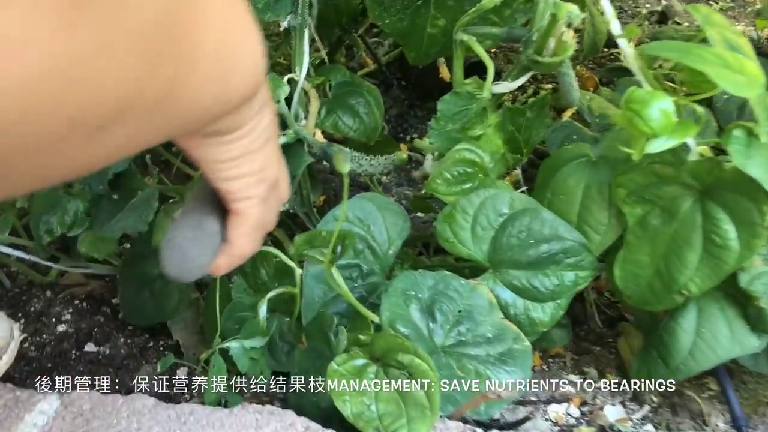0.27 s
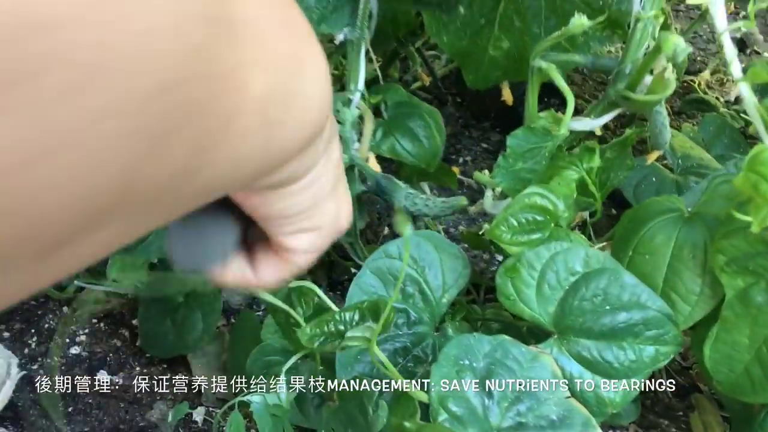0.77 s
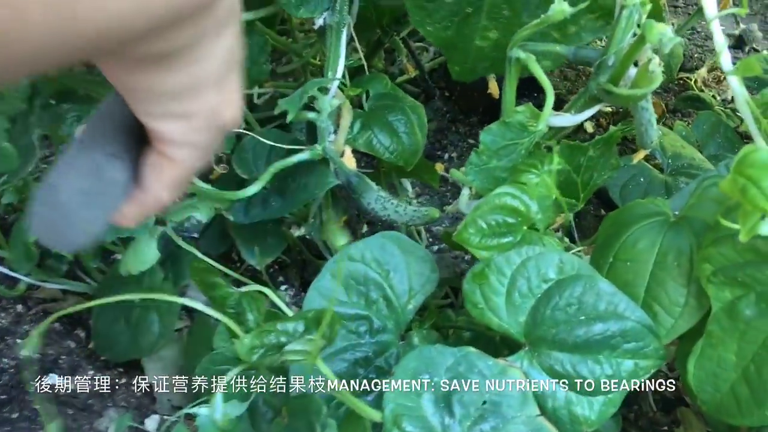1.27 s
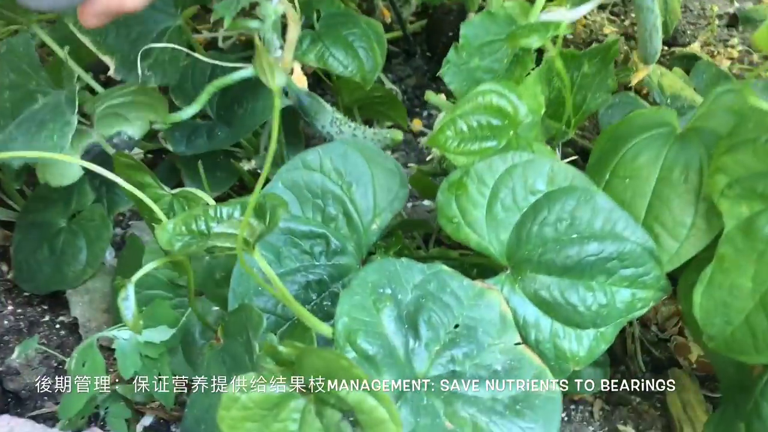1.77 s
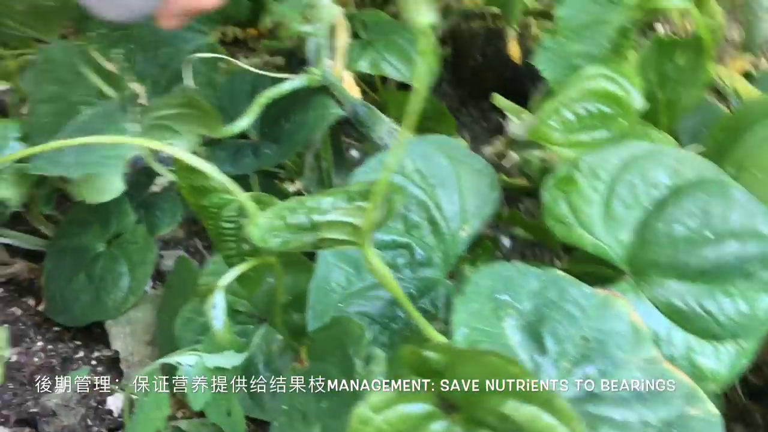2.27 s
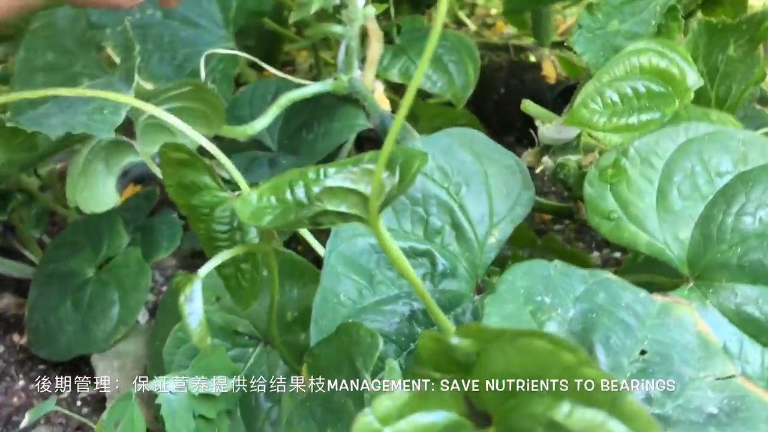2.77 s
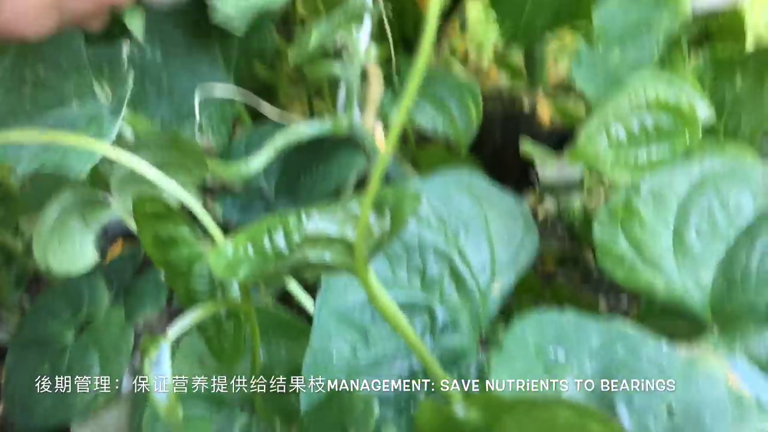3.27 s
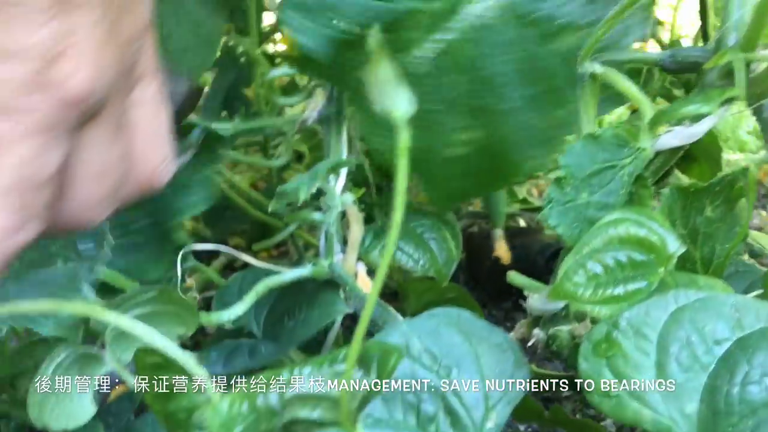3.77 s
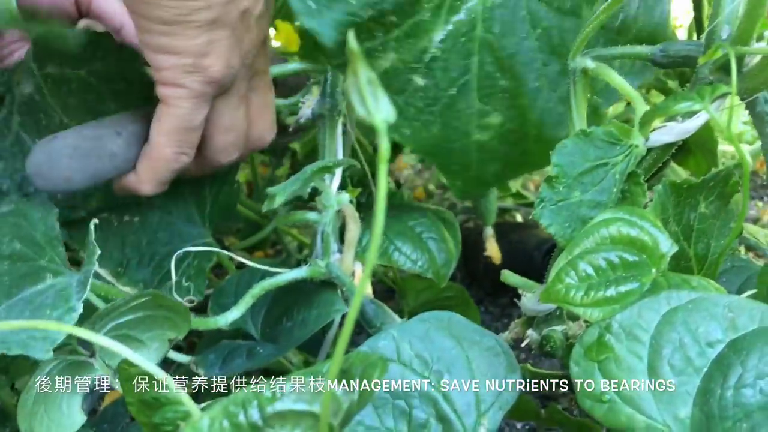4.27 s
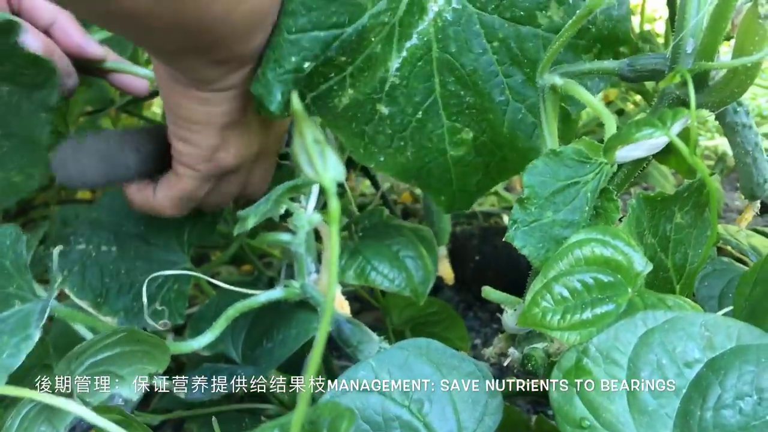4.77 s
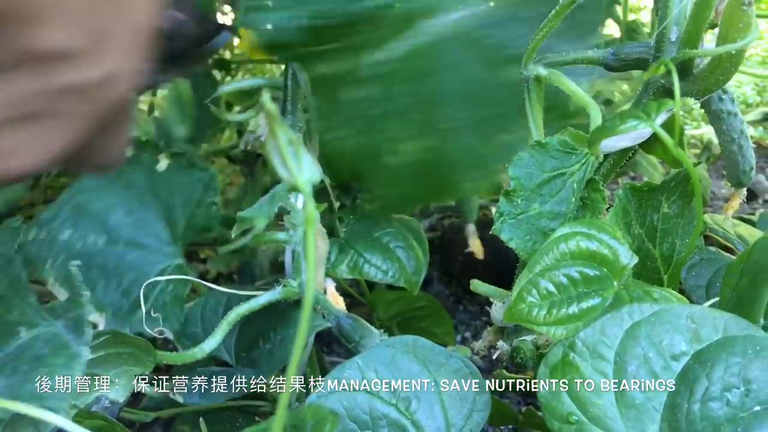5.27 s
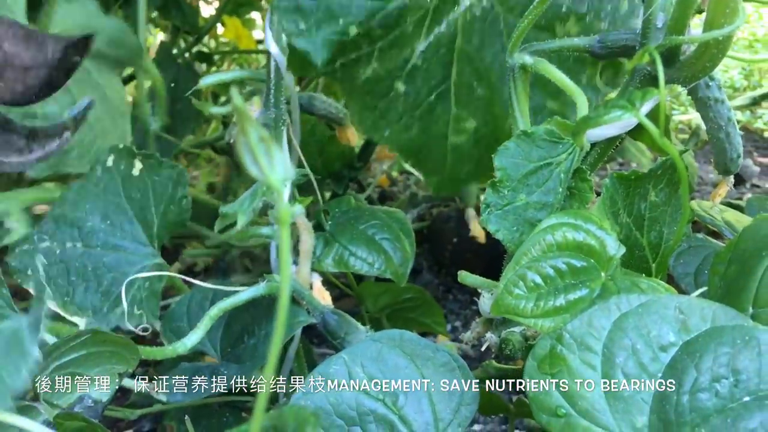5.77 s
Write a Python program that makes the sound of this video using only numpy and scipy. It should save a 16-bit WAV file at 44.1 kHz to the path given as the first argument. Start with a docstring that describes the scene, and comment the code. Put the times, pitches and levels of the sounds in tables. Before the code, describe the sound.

In an open garden, heard close up, soft leaf rustle leads to a quick, squeaky shear snip. More leaf sweeps follow, then a louder, crunchier second snip, a busy passage of rasping, flicking foliage, and a third, more drawn-out stuttering squeal with a light crunch. Small lower squeaks and thin chirps follow each cut as the shears reopen. A low steady far-off machine hum lies beneath, with almost no echo.

```python
"""Leaves brush the arm from the start: noise of tiny impacts swelling in sweeps, with rasping drags and ticks.
Three cuts with hand pruning shears follow in a garden bed, near 0.6, 2.4 and 4.8 s. In each the dry steel
blades squeal shut (gliding stick-slip tones), crunch through a stem (grain bursts ringing steel and handles),
then squeak lower as the spring opens them; the pivot chirps thinly. Throughout, a distant machine hums
(sines over low noise) in faint air; a thin hiss rises towards the end."""
import sys
import numpy as np
from scipy import signal
from scipy.fft import rfft, irfft, next_fast_len
from scipy.io import wavfile

SR = 44100
rng = np.random.default_rng(int(sys.argv[2]) if len(sys.argv) > 2 else 0)


def put_to_file(sound):
    """Save the sound as 16-bit audio at rate SR, in the file named by the first command-line argument."""
    columns = np.atleast_2d(sound).T  # one column per channel
    safe = np.clip(columns, -1, 1)
    whole_steps = np.round(safe * 32767)
    wavfile.write(sys.argv[1], SR, whole_steps.astype(np.int16))


N = 265834
TIME_S = np.arange(N) / SR

# slips of the closing, then opening blades:
# (start [s], length [s], first pitch [Hz], last pitch [Hz], fundamental level [dB], roughness [0-1])
CLOSING_SLIPS = [(.608, 0.018, 6500, 6560, -25.5, .1), (.624, .015, 6590, 6630, -23, .35),
                 (.6395, 0.0066, 6440, 6360, -15, 0.53), (.649, .011, 6700, 6920, -26.5, 0.7),
                 (.665, .008, 7150, 7250, -31, 0.7), (.675, 0.0062, 4480, 4630, -26.5, 0.88),
                 (2.418, .004, 5900, 5660, -18, 0.5), (2.422, 0.0044, 5380, 5340, -14, 0.63),
                 (2.431, 0.01, 6140, 6300, -16.5, 0.6), (2.4465, .009, 6450, 6880, -14.5, 0.65),
                 (2.456, 0.0091, 6850, 7320, -22.5, .85), (2.466, 0.028, 4550, 4800, -41, .75),
                 (2.486, 0.0083, 4200, 4900, -25.5, 0.88), (4.794, 0.0054, 6030, 5970, -34, .1),
                 (4.801, 0.01, 6050, 6100, -20, 0.07), (4.812, 0.011, 6240, 6120, -22, 0.07),
                 (4.823, .014, 6060, 6170, -21, 0.08), (4.836, 0.012, 6200, 6100, -25, 0.4),
                 (4.85, 0.039, 6150, 6370, -44, .3), (4.914, 0.012, 6700, 6750, -26.5, 0.27),
                 (4.927, 0.027, 6560, 6370, -42, 0.7), (4.959, 0.008, 6800, 6830, -22.5, 0.57),
                 (4.972, 0.013, 6600, 7120, -20.5, 0.63), (5.0, 0.0028, 5950, 5800, -24, 0.7)]
OPENING_SLIPS = [(.843, .006, 3760, 3680, -31, 0.33), (.884, 0.02, 3950, 3730, -38, 0.3),
                 (.906, 0.024, 3780, 3760, -45.5, 0.1), (2.769, 0.0095, 3810, 3650, -27, 0.28),
                 (2.814, 0.021, 3910, 3620, -29, 0.24), (2.836, 0.033, 3560, 3400, -42, 0.05),
                 (5.262, 0.011, 3930, 3660, -39.5, 0.57), (5.298, 0.029, 3750, 3760, -45.5, .1)]
# chirps of the pivot: (centre [s], pitch [Hz], level [dB], length [s])
PIVOT_CHIRPS = [(.895, 13100, -43, 0.015), (1.245, 13400, -58, .02), (2.496, 6380, -26, 0.0045),
                (2.819, 14100, -35, .014), (2.871, 13700, -42, 0.014), (2.915, 13300, -43, .02),
                (5.211, 3460, -48, 0.009), (5.266, 12600, -40, .016), (5.669, 13300, -34, 0.012)]
# blade crushing through a stem: (centre [s], level [dB], length [s])
STEM_CRUNCHES = [(0.664, -47.5, .025), (0.676, -33, 0.014), (0.689, -38.5, 0.027), (2.444, -32, 0.015),
                 (2.462, -34.5, 0.03), (2.494, -33, 0.032), (4.959, -39, 0.0083), (4.99, -36.5, 0.039),
                 (5.003, -36.5, 0.0078)]
# modes of the steel blades: ([Hz])
BLADE_MODES_HZ = [4330, 9000, 12460]
# arm sweeping through leaves:
# (start [s], length [s], relative level [dB], growth over the sweep [dB], treble over middle [dB])
LEAF_SWEEPS = [(0, 0.11, -52, -10, -2), (.47, .06, -62, 0, 12), (0.707, 0.063, -52, 3, 5),
               (0.828, 0.11, -49.5, 13, -1.5), (1.139, 0.078, -49, -6, 1), (1.21, 0.15, -50.5, 10, -2),
               (1.384, 0.465, -44.5, 4.5, -1), (1.992, 0.18, -55.5, 2, -9), (2.502, 0.052, -49, 7, -11),
               (2.787, 0.17, -47.5, -1, -2.5), (2.973, 0.23, -43, 0, -4.5),
               (3.231, 0.16, -43.5, -4.5, -3.5), (3.413, 0.11, -43.5, 5, 1.5), (3.481, 0.29, -35, -2, 0.5),
               (3.731, 0.2, -40, -1, -4.5), (4.13, 0.092, -48.5, 1, 1), (4.238, 0.055, -39.5, 2, 4),
               (4.285, 0.13, -55, -5, -3), (4.53, 0.07, -48.5, -3, -6.5), (5.233, 0.24, -46.5, -3, -4.5),
               (5.584, 0.16, -50, 8, -1.5), (5.779, 0.087, -41, -3, -9)]
# faint rustle between sweeps: (time [s], relative level [dB])
RUSTLE_LEVEL = [(0, -63), (.4, -56.5), (.6, -88), (.8, -55), (1.05, -63.5), (1.25, -62), (1.93, -77),
                (2.2, -62.5), (2.4, -57), (2.65, -53.5), (4.0, -58.5), (4.1, -52.5), (4.7, -55.5),
                (5.05, -50.5), (5.52, -57.5), (6.03, -49.5)]
# leaves and stalks flicking: (peak time [s], relative level [dB], treble over middle [dB])
LEAF_FLICKS = [(.278, -45, 6), (0.816, -39, -1), (1.072, -44.5, 10), (1.161, -41, 6), (1.889, -41, 1),
               (2.004, -42, -1), (2.076, -39, -13), (2.661, -34, -9), (2.798, -39.5, 18), (2.97, -31, -2.5),
               (3.422, -39, 2), (3.694, -25.5, -5), (4.023, -44.5, -3), (5.125, -43, -13),
               (5.139, -43.5, -24), (5.572, -43, 0), (5.763, -36, 4)]
# leaf or stalk dragging over the arm: (centre [s], level [dB], length [s], resonance [Hz])
LEAF_DRAGS = [(1.086, -55, 0.027, 2700), (1.171, -48, 0.045, 3020), (1.616, -58, 0.61, 3470),
              (1.832, -51, 0.088, 750), (1.85, -47.5, 0.031, 1480), (2.663, -46.5, 0.04, 1980),
              (3.058, -51, 0.23, 1490), (3.424, -46.5, 0.05, 5400), (3.57, -41.5, 0.21, 3800),
              (3.681, -34, 0.082, 4030), (3.72, -45.5, 0.19, 1390), (3.852, -44, 0.061, 2830),
              (4.258, -41.5, .052, 6240), (5.81, -56, .15, 920)]
# thin hiss: (time [s], level [dB])
WHINE_LEVEL = [(.4, -77), (.6, -82), (4, -81), (5.6, -62.5)]
# far machine: (time [s], level [dB])
MACHINE_LEVEL = [(0, -50), (.65, -49), (.85, -45.5), (2.0, -44), (3.6, -49), (4.3, -45.5), (6.03, -46.5)]
# steady tones of the machine: (frequency [Hz], level relative to the machine [dB])
MACHINE_TONES = [(37.5, -22.5), (53, -9.5), (113, -10), (120, -7), (205.5, -14), (240, -20)]
# spectral shapes of leaf, stem, machine rumble and outdoor air: (frequency [Hz], gain [dB])
LEAF_SPECTRUM = [(250, 1.5), (500, -5), (900, -4), (1500, -2.5), (2200, -1), (2750, -4.5), (3700, 0),
                 (5000, -2), (6300, 1), (7800, -4), (9400, -1), (10400, -9), (11300, -5), (15800, -11.5)]
STEM_SPECTRUM = [(400, -3.5), (1000, -10.5), (1900, -2.5), (2800, -2), (4600, -2), (7500, 4), (9200, -5),
                 (10500, -7), (15800, 4)]
RUMBLE_SPECTRUM = [(30, -23), (38, 3), (52, -11), (68, -2.5), (92, 1.5), (125, 1.5), (150, -2), (175, -6.5),
                   (200, -6), (235, -12.5), (280, -15.5), (350, -21), (480, -48)]
AIR_SPECTRUM = [(350, 7.5), (700, 6.5), (1000, 1), (1300, -2.5), (1800, -0.5), (2200, -11), (2800, -2.5),
                (3700, -8), (4900, -6), (6400, -2.5), (9000, -8.5), (15000, -2)]


def squeaks(slips, jitter, waver, flutter_db, third_db, fourth_db):
    """Stick-slip drives a blade mode: a gliding, wavering tone breaks up and gains its octave as grip hardens."""
    clean_octave_db, rough_octave_db = -24, 10   # at roughness 0 and 1
    attack_s, release_s, sag_db = 0.0011, 0.0013, 0.8
    out, fast, slow = np.zeros(N), drift(580), drift(83)
    flutter = [np.tanh(drift(200)) - 1 for _ in range(4)]   # each partial dips on its own
    for start_s, length_s, first_hz, last_hz, level_db, rough in slips:
        rough = np.clip(rough, 0, 1)
        on, progress, envelope = gate(start_s, length_s, attack_s, release_s)
        glide_hz = first_hz + (last_hz - first_hz) * progress
        pitch_hz = glide_hz * (1 + jitter * rough * fast[on] + waver * slow[on])
        phase = 2 * np.pi * np.cumsum(pitch_hz) / SR
        octave_db = clean_octave_db + (rough_octave_db - clean_octave_db) * rough
        tone = 0
        for k, partial_db in enumerate([0, octave_db, third_db, fourth_db], 1):
            gain = from_db(partial_db + flutter_db * rough * flutter[k - 1][on])
            below_nyquist = k * pitch_hz < SR / 2
            tone = tone + gain * np.sin(k * phase) * below_nyquist
        out[on] += np.sqrt(2) * tone * envelope * from_db(level_db - sag_db * progress)
    return out


def pivot(wobble_hz=230):
    """The pivot catches for an instant and sings one wavering note."""
    wobble = wobble_hz * np.cumsum(drift(532)) / SR   # in cycles
    out = np.zeros(N)
    for centre_s, hz, level_db, length_s in PIVOT_CHIRPS:
        note = np.sin(2 * np.pi * (hz * TIME_S + wobble))
        out += np.sqrt(2) * from_db(level_db) * swell(centre_s, length_s) * note
    return out


def stems(blade_db=-12, blade_q=45, body_db=-1, body_hz=1850, body_q=8):
    """Fibres burst in a dense run as the edge passes through, and set the steel and the handles ringing."""
    fibres = coloured(grains(per_s=7800, spread_db=5.5), STEM_SPECTRUM)
    force = sum(from_db(db) * swell(centre_s, length_s) for centre_s, db, length_s in STEM_CRUNCHES)
    snap = fibres * force
    steel = sum(resonance(snap, hz, blade_q) for hz in BLADE_MODES_HZ) * np.sqrt(blade_q)
    handles = resonance(snap, body_hz, body_q)
    return snap + from_db(blade_db) * steel + from_db(body_db) * handles


def scatter(x, level_db=-21, t60_s=0.087):
    """Soil and surrounding leaves send back a faint, short spray of echoes."""
    age_s = TIME_S[:SR // 5]
    echoes = rng.standard_normal(len(age_s)) * from_db(-60 * age_s / t60_s) * (age_s > 0.003)
    return from_db(level_db) * signal.fftconvolve(x, echoes / np.linalg.norm(echoes))[:N]


def foliage(patchy_db=1.4, crackle_db=-2, sweep_db=-2.0, rustle_db=-3, rustle_bright_db=-3,
            wander_db=-1.5, colour_db=2.5):
    """Leaf hairs catch and let go: fine hiss with coarser crackle, faint between sweeps, louder in each."""
    attack_s, release_s = 0.01, 0.013   # leaves bend against the arm, then slide off it
    coarse = crackle(per_s=2600, spread_db=2.5, q=6.7, patchy_db=2)
    hairs = grains(per_s=11000, spread_db=1.0) + from_db(crackle_db) * coarse
    power = from_db(in_time(RUSTLE_LEVEL)[0] + rustle_db + wander_db * drift(24)) ** 2
    weighted_bright = power * rustle_bright_db
    for start_s, length_s, level_db, growth_db, bright_db in LEAF_SWEEPS:
        on, progress, envelope = gate(start_s, length_s, attack_s, release_s)
        sweep_level_db = sweep_db + level_db + growth_db * (progress - 0.5)
        sweep_power = (envelope * from_db(sweep_level_db)) ** 2
        power[on] += sweep_power
        weighted_bright[on] += sweep_power * bright_db
    tilt_db = weighted_bright / power + colour_db * drift(6.6)
    texture = tilted(coloured(hairs, LEAF_SPECTRUM), tilt_db)
    return texture * np.sqrt(power) * from_db(patchy_db * drift(35))


def crackle(per_s, spread_db, q, patchy_db, count=14):
    """Small snaps come in clumps, each ringing for a few cycles at the pitch of its own patch of leaf."""
    pitches_hz = np.geomspace(900, 12000, count)
    out = np.zeros(N)
    for hz in pitches_hz:
        snaps = grains(per_s * hz / pitches_hz.sum(), spread_db)   # higher patches snap more often
        out += resonance(snaps, hz, q) * from_db(patchy_db * drift(22.0))
    return rms_one(out)


def drags(q=2.07):
    """A leaf slips in small jerks that keep its blade ringing."""
    jerks, out = grains(per_s=4000, spread_db=3.5), np.zeros(N)
    for centre_s, level_db, length_s, hz in LEAF_DRAGS:
        stroke = swell(centre_s, length_s)
        on = stroke > 0
        rasp = resonance(resonance(jerks[on], hz, q), hz, q)
        out[on] += from_db(level_db) * stroke[on] * rms_one(rasp)
    return out


def flicks(level_db=-2, rise_s=0.00098, decay_s=0.0041):
    """A snagged leaf springs free with a short burst that dies at once."""
    force, bright_db = np.zeros(N), np.zeros(N)
    for peak_s, flick_db, flick_bright_db in LEAF_FLICKS:
        start = int((peak_s - rise_s) * SR)
        age_s = TIME_S[:min(SR // 10, N - start)]
        shape = np.minimum(age_s / rise_s, 1) * np.exp(-age_s / decay_s)
        force[start:start + len(age_s)] += from_db(flick_db) * shape
        bright_db[start:] = flick_bright_db   # held until the next flick
    texture = coloured(grains(per_s=9200, spread_db=1.8), LEAF_SPECTRUM)
    return from_db(level_db) * force * tilted(texture, bright_db)


def stirring(level_db=-62, per_s=40, spread_db=0.9, decay_s=0.0035):
    """Disturbed leaves keep settling: scattered impacts open decaying bursts of leaf-coloured noise."""
    decay = np.exp(-1 / (decay_s * SR))
    ticks = signal.lfilter([1], [1, -decay], np.abs(grains(per_s, spread_db)) + 1e-18)
    return from_db(level_db) * rms_one(ticks * coloured(rng.standard_normal(N), LEAF_SPECTRUM))


def whine(hz=2180, q=6.8, waver_db=2.0):
    """Doubly resonant noise: a thin, wavering band of distant hiss sinks away and returns."""
    band = rms_one(resonance(resonance(rng.standard_normal(N), hz, q), hz, q))
    return band * from_db(in_time(WHINE_LEVEL)[0] + waver_db * drift(3.0))


def background(rumble_db=-0.5, air_db=-60, waver_db=1.75, waver_rad=0.92, lumpy_db=1.06):
    """A far machine: tones wavering in level and phase in a low rumble, under faint outdoor air."""
    tones = np.zeros(N)
    for hz, tone_db in MACHINE_TONES:
        gain = from_db(tone_db + waver_db * drift(0.99))
        tones += gain * np.sin(2 * np.pi * hz * TIME_S + waver_rad * drift(1.65))
    rumble = coloured(rng.standard_normal(N), RUMBLE_SPECTRUM)
    machine = from_db(rumble_db) * rumble + np.sqrt(2) * tones
    machine_gain = from_db(in_time(MACHINE_LEVEL)[0] + lumpy_db * drift(15))
    air = from_db(air_db) * coloured(rng.standard_normal(N), AIR_SPECTRUM)
    return machine * machine_gain + air


def grains(per_s, spread_db):
    """Random tiny impacts of either sign, a few much stronger than the rest; rms 1."""
    sizes = from_db(spread_db * np.minimum(rng.exponential(1, N), 5))
    return rms_one(sizes * rng.choice([-1, 1], N) * (rng.random(N) < per_s / SR))


def resonance(x, hz, q):
    """One ringing mode, gain 1 at its centre."""
    return signal.lfilter(*signal.iirpeak(hz, max(q, 1.5), fs=SR), x + 1e-18)


def coloured(x, spectrum):
    """Shape a sound by a gain curve that falls away steeply past its ends; rms 1."""
    size = next_fast_len(N)
    hz = np.maximum(np.fft.rfftfreq(size, 1 / SR), 1)
    points_hz, level_db = np.transpose(spectrum)
    gain = from_db(np.interp(np.log(hz), np.log(points_hz), level_db))
    skirts = np.minimum(1, np.minimum(hz / points_hz[0], points_hz[-1] / hz)) ** 3
    return rms_one(irfft(rfft(x, size) * gain * skirts, size)[:N])


def tilted(x, bright_db, split_hz=3800):
    """Lean a sound towards its treble (positive) or its middle."""
    low = signal.sosfiltfilt(signal.butter(2, split_hz, fs=SR, output="sos"), x)
    return low * from_db(-bright_db / 2) + (x - low) * from_db(bright_db / 2)


def gate(start_s, length_s, attack_s, release_s):
    """Samples a gesture covers, its progress 0-1, and its smooth envelope, near half at start and end."""
    on = (TIME_S > start_s - 10 * attack_s) & (TIME_S < start_s + length_s + 10 * release_s)
    age_s = TIME_S[on] - start_s
    rise = 0.5 + 0.5 * np.tanh(age_s / attack_s / 2)
    fall = 0.5 + 0.5 * np.tanh((length_s - age_s) / release_s / 2)
    return on, np.clip(age_s / length_s, 0, 1), rise * fall


def swell(centre_s, length_s):
    """A half-cosine rise and fall."""
    out, on = np.zeros(N), np.abs(TIME_S - centre_s) < length_s / 2
    out[on] = np.cos(np.pi * (TIME_S[on] - centre_s) / length_s)
    return out


def drift(corner_hz):
    """Noise through a two-pole low-pass, made at SR/8 with rms 1, then interpolated."""
    pole = np.exp(-2 * np.pi * corner_hz / (SR / 8))
    settle = 8000   # samples dropped while the filter settles
    noise = rng.standard_normal(N // 8 + settle + 2)
    slow = signal.lfilter([1], [1, -2 * pole, pole * pole], noise)[settle:]
    return np.interp(np.arange(N) / 8, np.arange(len(slow)), rms_one(slow))


def in_time(rows):
    """Each column of a curve, joined by straight lines."""
    points_s, *columns = np.transpose(sorted(rows))
    return [np.interp(TIME_S, points_s, column) for column in columns]


def from_db(db):
    """Decibels to gain."""
    return 10 ** (np.asarray(db) / 20)


def rms_one(x):
    """Scale to rms 1."""
    return x / np.sqrt(np.mean(x ** 2) + 1e-20)


def scene():
    """Shears and leaves close by, in the open air."""
    closing = squeaks(CLOSING_SLIPS, jitter=0.018, waver=0.0091, flutter_db=2.2, third_db=-14, fourth_db=-25)
    opening = squeaks(OPENING_SLIPS, jitter=0.093, waver=0.0057, flutter_db=5.5, third_db=-20, fourth_db=-25)
    shears = closing + opening + pivot() + stems()
    leaves = foliage() + drags() + flicks() + stirring()
    return (shears + scatter(shears) + leaves + whine() + background())[None]


def record(dry):
    """A steep elliptic low-pass cuts the top."""
    cutoff_hz, ripple_db, stop_db = 15900, 0.1, 80
    return signal.sosfilt(signal.ellip(12, ripple_db, stop_db, cutoff_hz, fs=SR, output="sos"), dry)


dry = scene()
out = record(dry)
put_to_file(out)
```